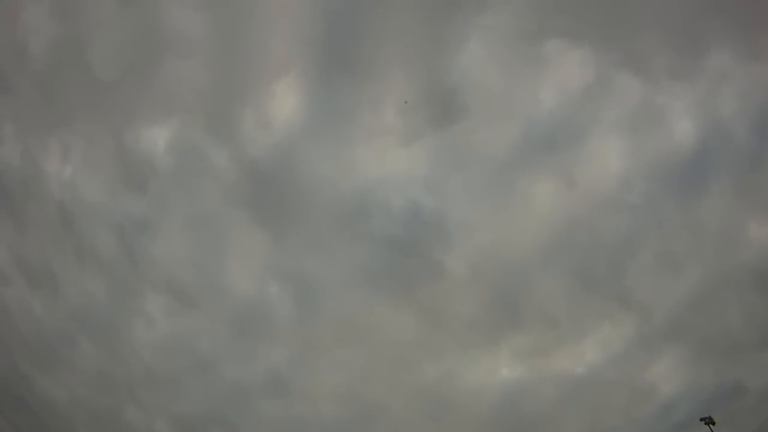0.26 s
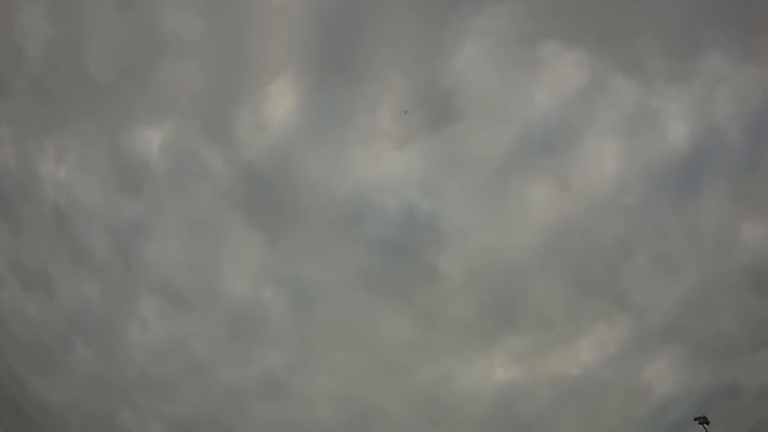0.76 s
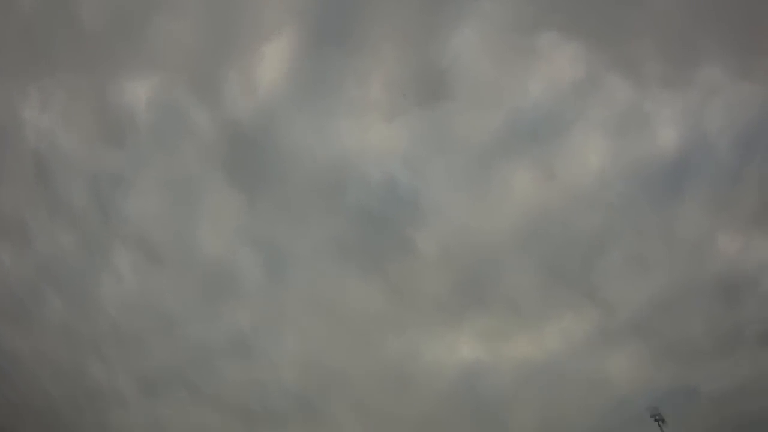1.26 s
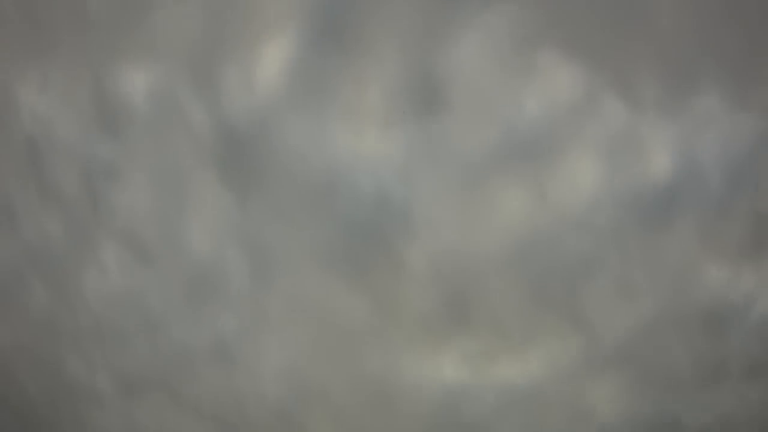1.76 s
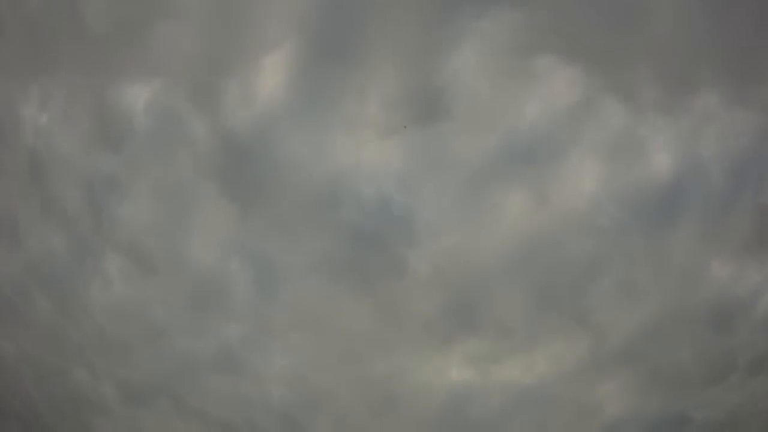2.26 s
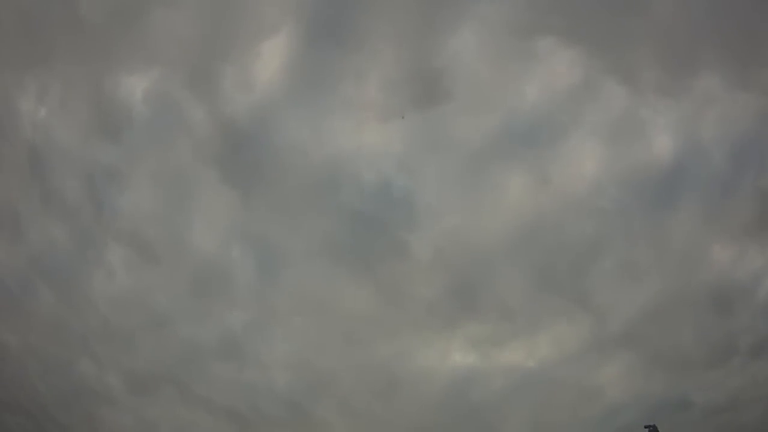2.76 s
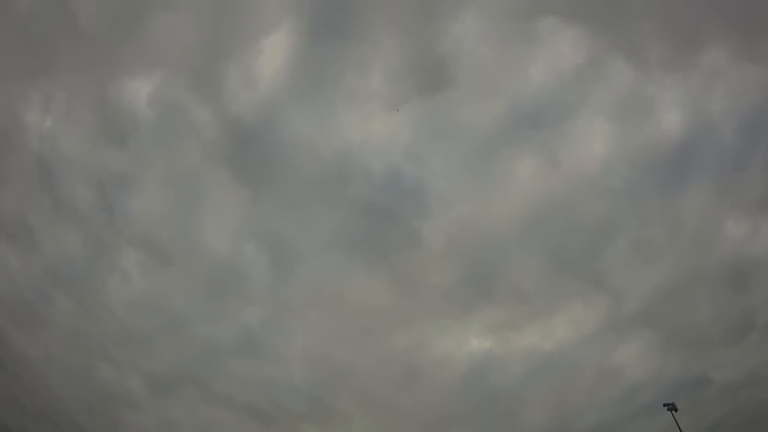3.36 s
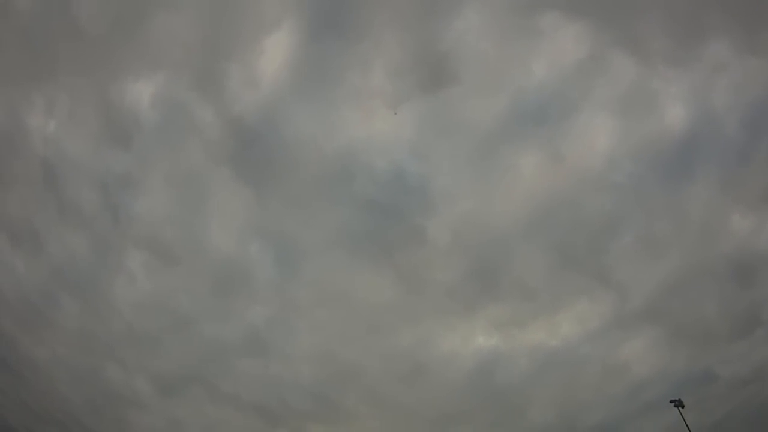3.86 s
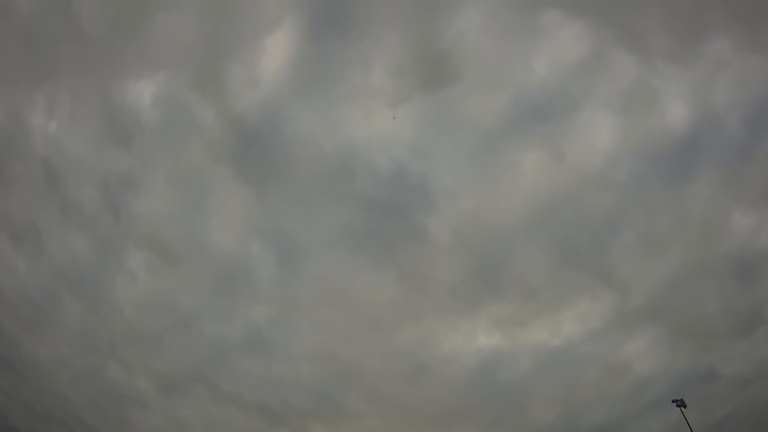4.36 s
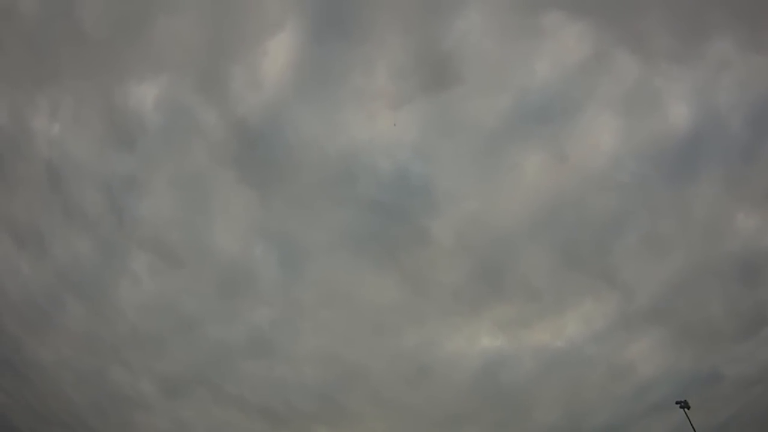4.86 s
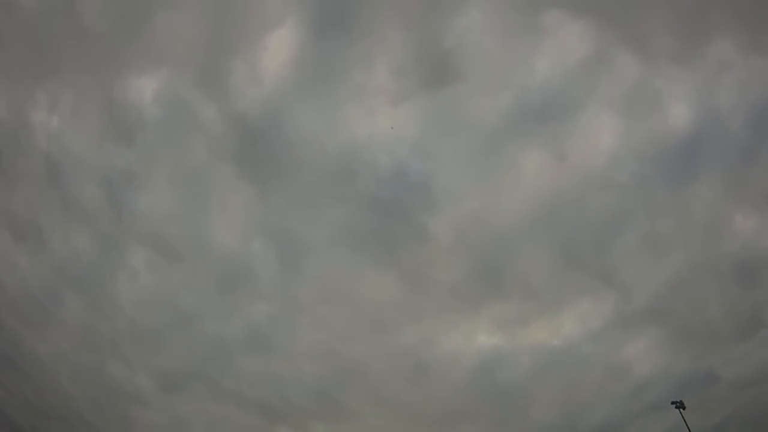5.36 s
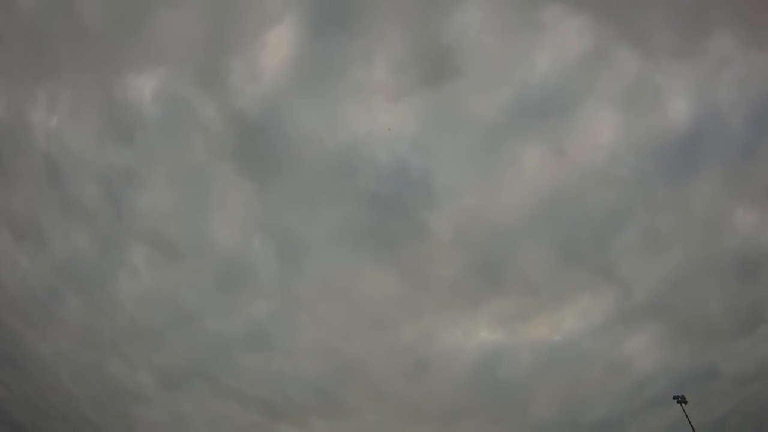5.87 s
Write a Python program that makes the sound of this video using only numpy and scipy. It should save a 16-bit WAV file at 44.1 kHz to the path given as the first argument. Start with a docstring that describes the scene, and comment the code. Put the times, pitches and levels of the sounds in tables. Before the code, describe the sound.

A quiet outdoor scene, heard from a small microphone on the ground with slightly gritty treble. The rumble and hiss of far traffic continue for the whole six seconds, along with a faint, wavering low engine hum. Some way off, a small toy drone gives thin, high motor whines that glide, jump and overlap as the throttle changes. Its propellers add short raspy buzzes, strongest around 1 and 1.7 seconds. The whine flicks upward near 2.5 and 3 seconds, then becomes fainter and more broken, with quick swoops from about 4.4 seconds on. Meanwhile a distant vehicle coasts with a low drone and drops to an uneven idle at about 2.5 seconds. At around 4.7 seconds its engine rises in pitch and gets clearly louder as it pulls away, staying the most prominent sound until the end.

```python
"""Toy quadcopter over a field

Some way off, motor whines glide near 4 kHz and the rotors buzz in the frame's resonance.
A vehicle idles, then pulls away, over a fainter hum and the rumble and hiss of far traffic.
A small camera on the ground samples at 12 kHz and holds each value, mirroring the treble."""
import sys
import numpy as np
from scipy import signal
from scipy.fft import rfft, irfft
from scipy.io import wavfile
from scipy.ndimage import uniform_filter1d

SR = 44100
rng = np.random.default_rng(int(sys.argv[2]) if len(sys.argv) > 2 else 0)


def wrap_up_sound(samples):
    """Save the sound to the file named by the first command line argument, as 16-bit audio."""
    columns = np.atleast_2d(samples).T
    # keep every value between -1 and 1, then stretch to whole-number steps
    tamed = np.clip(columns, -1, 1)
    steps = np.round(tamed * 32767).astype(np.int16)
    wavfile.write(sys.argv[1], SR, steps)


N = 269392


def undb(db):
    """dB to gain."""
    return 10 ** (np.asarray(db) / 20)


def at_rms(x, db):
    """x scaled to an rms level."""
    return x * undb(db) / np.sqrt(np.mean(x ** 2))


def curves(table):
    """Columns after t/s, linearly interpolated per sample."""
    times_s, *columns = np.transpose(table)
    return [np.interp(np.arange(N) / SR, times_s, column) for column in columns]


def phase_rad(hz):
    """Running phase, random start."""
    return 2 * np.pi * (np.cumsum(hz) / SR + rng.random())


def drift(rate_hz):
    """Random steps at rate_hz, smoothed twice; unit spread."""
    hold = int(SR / rate_hz)
    steps = np.repeat(rng.standard_normal(N // hold + 1), hold)
    smooth = uniform_filter1d(uniform_filter1d(steps, hold), hold)[:N]
    return smooth / smooth.std()


def shaped_noise(spectrum):
    """Noise shaped by (f/Hz, level/dB) points."""
    hz, db = np.transpose(spectrum)
    bins_hz = np.maximum(np.fft.rfftfreq(N, 1 / SR), 1)
    gain = undb(np.interp(np.log(bins_hz), np.log(hz), db))
    return irfft(rfft(rng.standard_normal(N)) * gain, N)


# Throttle steps, one list per motor: t/s, from/Hz (None: carry on), to/Hz, lag/s, level/dB (-99: silent)
THROTTLE_STEPS = [
    [(0, 4243, 4500, 1.5, -67), (.46, 4012, 4760, .03, -69), (.52, 3850, 4420, .04, -69.5),
     (.67, None, 4400, 0.13, -99), (.71, 4040, 4130, 0.055, -75), (.775, 4380, 4555, 0.027, -66),
     (.85, None, 4350, .07, -67.5), (1.14, 4500, 4370, 0.095, -73), (1.83, None, 4360, .1, -99),
     (2.66, 4447, 4317, 0.076, -67), (3.02, 4500, 4610, 0.017, -70), (3.08, None, 4500, .1, -99),
     (3.42, 3780, 3955, 0.16, -75), (3.78, None, 3950, 0.094, -99), (4.98, 2565, 2597, 0.054, -79),
     (5.13, None, 2608, 0.11, -99), (5.21, 3470, 4280, .11, -79), (5.58, None, 4340, 0.099, -99),
     (5.64, 5150, 5340, 0.054, -77), (5.9, None, 5323, 0.094, -99), (5.96, 4720, 4625, .03, -69.5),
     (6.03, None, 4930, .1, -66.5)],
    [(0, 3970, 3900, .1, -99), (.58, 3880, 3720, .03, -71), (.64, None, 4010, 0.1, -69.5),
     (.785, None, 3930, .04, -68), (.87, None, 4150, .1, -76), (1.07, None, 4050, 0.065, -68),
     (1.33, None, 4160, 0.082, -65), (1.66, None, 4250, 0.054, -65), (1.76, None, 4140, 0.041, -69),
     (1.83, None, 4290, .15, -65.5), (2.28, None, 4220, 0.093, -67), (2.55, None, 5500, .15, -64),
     (2.625, None, 4486, .03, -69), (2.65, 4280, 4085, .06, -73), (2.92, None, 4097, 0.11, -99),
     (3.045, 3750, 4610, .05, -71), (3.07, None, 4630, .05, -62.5), (3.25, None, 4530, .15, -67),
     (3.55, None, 4586, 0.092, -70), (3.8, None, 4395, .25, -68.5), (4.15, None, 4425, 0.12, -69),
     (4.365, None, 5023, 0.022, -70.5), (4.412, 3490, 4750, .021, -68.5), (4.48, None, 4420, .06, -70.5),
     (4.965, None, 5300, .045, -73.5), (5.03, None, 5300, .045, -76), (5.13, 2700, 4410, .1, -76.5),
     (5.33, None, 4402, .08, -71), (5.59, None, 5180, .035, -69), (5.635, 4900, 5140, 0.076, -75),
     (5.9, None, 4790, .15, -71), (6.02, None, 4770, .1, -99)],
    [(0, 3800, 3700, 0.092, -99), (.82, 3650, 4506, .15, -67.5), (.94, None, 4200, .1, -99),
     (4.48, 4430, 4220, 0.064, -75), (4.6, None, 4220, .1, -99), (5.15, 4970, 4775, .15, -80),
     (5.43, None, 4753, 0.093, -99), (6.01, 3056, 3400, .07, -76)],
]


def motor_whines(throb, fade_s=0.016, flicker_db=1.6, chop_depth=0.29):
    """Three wavering tones; blade passes chop them into side tones at a steady depth."""
    tones = np.zeros(N)
    for steps in THROTTLE_STEPS:
        hz, db = throttle_response(steps)
        gain = uniform_filter1d(undb(db), int(fade_s * SR))
        flicker = undb(flicker_db * drift(220))
        waver_hz = 16.3 * drift(70) + 40 * drift(400)
        tones += flicker * gain * np.sin(phase_rad(hz + waver_hz))
    return np.sqrt(2) * tones * (1 + chop_depth * throb)


def throttle_response(steps, surge_db=6, surge_hz_per_s=40000):
    """One motor's pitch and level: pitch lags each step; speeding up is louder."""
    t, hz, db = np.arange(N) / SR, np.zeros(N), np.zeros(N)
    for start_s, from_hz, to_hz, lag_s, step_db in steps:
        i = int(start_s * SR)
        from_hz = hz[i] if from_hz is None else from_hz
        gap_hz = (to_hz - from_hz) * np.exp(-(t[i:] - t[i]) / lag_s)
        hz[i:] = to_hz - gap_hz
        db[i:] = step_db + surge_db * np.clip(gap_hz / lag_s / surge_hz_per_s, 0, 2)
    return hz, db


def rotor_throb(blade_hz=201, beat_hz=65.05, beat_depth=0.78, beat_share=0.45):
    """Blade passes, swelling with the beat of two rotors; unit rms."""
    blade = np.cos(phase_rad(blade_hz + 1.21 * drift(6)))
    beat = np.cos(phase_rad(beat_hz + 0.67 * drift(6.1)))
    return at_rms(blade * (1 + beat_depth * beat) + beat_share * beat, 0)


# Bouts of rotor buzz: t/s, length/s, level/dB, centre/Hz
BUZZ_BOUTS = [(0.048, 3.72, -77, 4190), (0.171, 0.31, -70, 4245), (.6, .29, -72, 3986),
              (0.915, .2, -65.5, 4200), (1.501, .14, -67, 4219), (1.621, 0.22, -62, 4240),
              (2.197, .13, -70, 4240), (2.648, .41, -67, 4310), (3.15, .9, -75, 3880),
              (4.1, .15, -71.5, 4150), (4.788, .12, -73.5, 4300), (5.401, .17, -80.5, 4280),
              (5.973, .2, -76.5, 4500)]


def buzz_bouts(rise_s=0.0543, fall_s=0.031):
    """Gain and centre frequency of the buzz; each bout rises, holds and falls."""
    t = np.arange(N) / SR
    start_s, length_s, db, hz = np.transpose(BUZZ_BOUTS)[:, :, None]
    ramps = np.minimum((t - start_s) / rise_s, (start_s + length_s - t) / fall_s)
    gains = np.clip(ramps + 0.5, 0, 1) * undb(db) + 1e-6
    total = gains.sum(axis=0)
    return total, (gains * hz).sum(axis=0) / total


def frame_buzz(throb, stray_hz=170):
    """The frame rings at each throb; fast pitch jitter makes the ring a rasp."""
    gain, centre_hz = buzz_bouts()
    push = np.maximum(0.55 + throb, 0)
    ring_hz = centre_hz + stray_hz * np.tanh(drift(600))
    return gain * at_rms(push * np.sin(phase_rad(ring_hz)), 0)


# Vehicle coasts, idles, pulls away: t/s, cycle rate/Hz, level/dB of harmonics 2, 3, 4
ENGINE_RUN = [(0, 47.3, -60.5, -66.5, -65.5), (1.1, 46.1, -63.5, -69, -66), (2.25, 43.15, -60.5, -71, -65),
              (2.5, 28, -68, -71, -86), (3.3, 26.95, -57.5, -57, -62.5), (3.6, 28.35, -61.5, -63.5, -58),
              (4.5, 29.89, -61.5, -68, -58.5), (4.7, 36.2, -62.5, -62, -70), (4.79, 41.34, -49, -52.5, -57),
              (4.89, 44.5, -50, -49.5, -53.5), (5.06, 46.26, -49, -48.5, -56.5),
              (5.7, 47.33, -50, -49.5, -60), (6.11, 49.6, -49.5, -45, -64)]


def engine_exhaust(pulling_db=-49.5, uneven_per_db=0.202):
    """Distant exhaust pulses: three phase-locked harmonics, more uneven when not pulling."""
    cycle_hz, *harmonics_db = curves(ENGINE_RUN)
    unevenness = 1 + uneven_per_db * np.clip(pulling_db - harmonics_db[0], 0, 8)
    phase = phase_rad(cycle_hz + 0.411 * unevenness * drift(20))
    pulses = np.zeros(N)
    for order, db in enumerate(harmonics_db, start=2):
        gain = undb(db + 1.35 * unevenness * drift(25))
        pulses += gain * np.cos(order * phase + 2.8)
    return np.sqrt(2) * pulses


def engine_roar(band_hz=(1080, 2500), relative_db=-21):
    """Band noise that grows as the engine pulls, tracking harmonic 2."""
    bandpass = signal.butter(2, band_hz, "band", fs=SR, output="sos")
    band = signal.sosfilt(bandpass, rng.standard_normal(N))
    return undb(curves(ENGINE_RUN)[1]) * at_rms(band, relative_db)


# Second, fainter vehicle: t/s, f/Hz, level/dB
HUM_TRACK = [(0, 167, -60.5), (1.05, 163, -66.5), (1.25, 137, -63.5), (1.7, 132.5, -62.5),
             (2.6, 120.9, -73.5), (3.4, 145.7, -60.5), (4.4, 164.9, -67.5), (6.11, 164.7, -76)]


def vehicle_hum(waver_db=3.5, waver_hz=4):
    """One wavering low tone."""
    hz, db = curves(HUM_TRACK)
    gain = undb(db + waver_db * drift(12))
    return np.sqrt(2) * gain * np.sin(phase_rad(hz + waver_hz * drift(14)))


# Traffic spectrum: f/Hz, relative density/dB
TRAFFIC_SPECTRUM = [(12, -47), (20, -17), (70, -5), (148, -8.5), (232, -11.5), (494, -16.5), (956, -16),
                    (2510, -27), (3490, -28.5), (4320, -26), (5600, -29.5), (7280, -53), (12300, -120)]
# Traffic swell: t/s, hiss/dB, rumble/dB
TRAFFIC_LEVELS = [(0, -58.5, -56.5), (1.4, -58, -56), (1.8, -57, -54), (3.2, -57.5, -57),
                  (4.1, -58.5, -55.5), (6.11, -58, -52.5)]


def far_traffic(split_hz=172.0):
    """Noise split into hiss and rumble that swell separately."""
    hiss_db, rumble_db = curves(TRAFFIC_LEVELS)
    noise = shaped_noise(TRAFFIC_SPECTRUM)
    low = signal.sosfiltfilt(signal.butter(2, split_hz, fs=SR, output="sos"), noise)
    hiss = undb(hiss_db + 0.62 * drift(5.97)) * at_rms(noise - low, 0)
    rumble = undb(rumble_db + 1.6 * drift(7)) * at_rms(low, 0)
    return hiss + rumble


def scene():
    """All sources at one microphone, same on both channels."""
    throb = rotor_throb()
    quadcopter = motor_whines(throb) + frame_buzz(throb)
    mono = quadcopter + engine_exhaust() + engine_roar() + vehicle_hum() + far_traffic()
    return np.array([mono, mono])


# Faint hiss, antiphase left and right: f/Hz, relative density/dB
SIDE_HISS_SPECTRUM = [(120, -42), (200, -33), (361, 3.5), (1060, -5), (3620, 3.5), (5200, -2.5), (6020, -9),
                      (7210, -2), (10000, -21), (13000, -47), (22000, -120)]


def record(dry, antialias_hz=5120.0, camera_hz=12000, hiss_db=-79, top_hz=15330):
    """Anti-alias filter, sample-and-hold mirroring the treble; then antiphase hiss, steep low-pass."""
    filtered = signal.sosfilt(signal.butter(4, antialias_hz, fs=SR, output="sos"), dry)
    sampled = signal.resample_poly(filtered, camera_hz, SR, axis=1)
    held = np.repeat(sampled, 4, axis=1)
    mirrored = signal.resample_poly(held, SR, 4 * camera_hz, axis=1)[:, :N]
    side_hiss = at_rms(shaped_noise(SIDE_HISS_SPECTRUM), hiss_db) * np.array([[1], [-1]])
    lowpass = signal.ellip(12, 0.2, 60, top_hz, fs=SR, output="sos")
    return signal.sosfilt(lowpass, mirrored + side_hiss)


dry = scene()
out = record(dry)
wrap_up_sound(out)
```